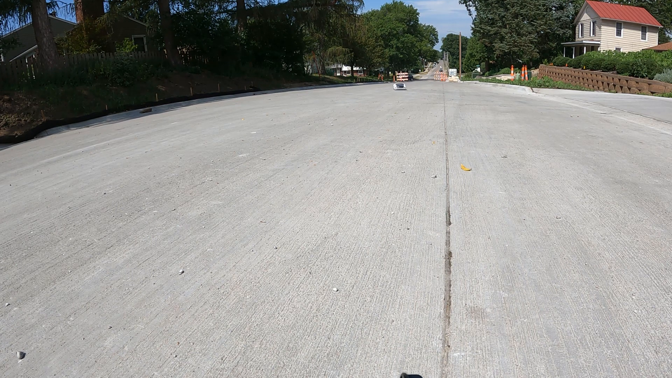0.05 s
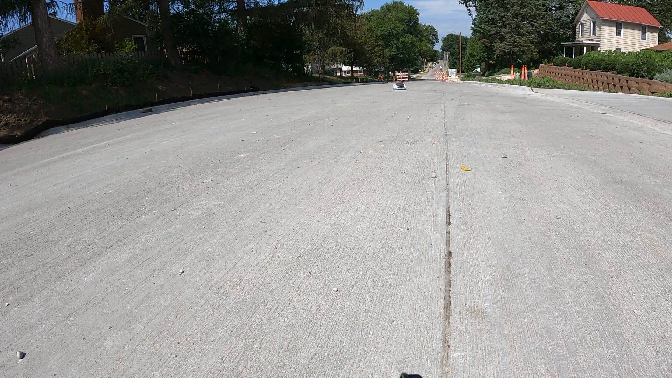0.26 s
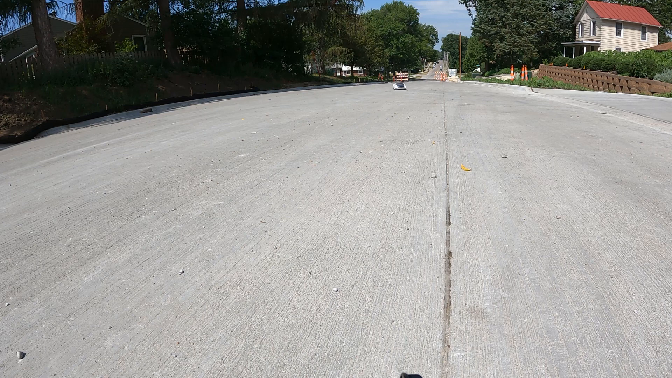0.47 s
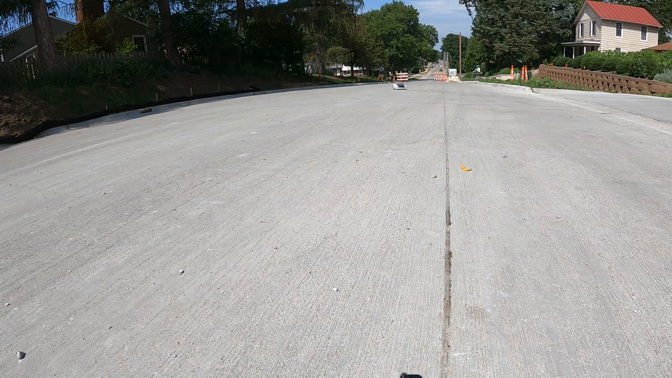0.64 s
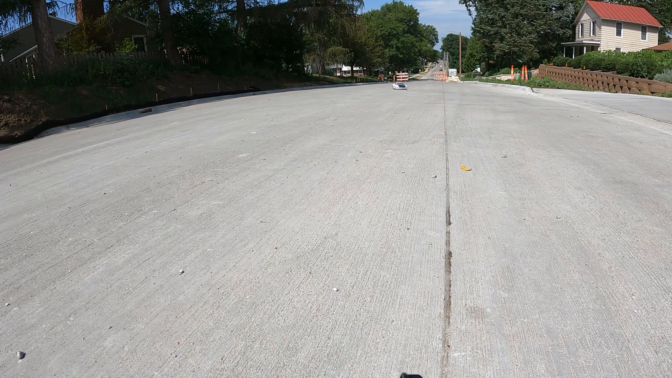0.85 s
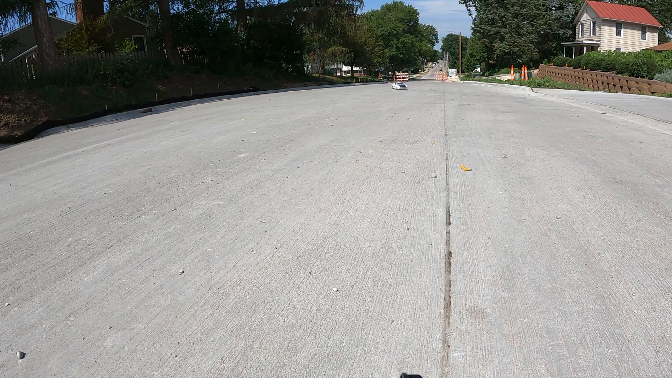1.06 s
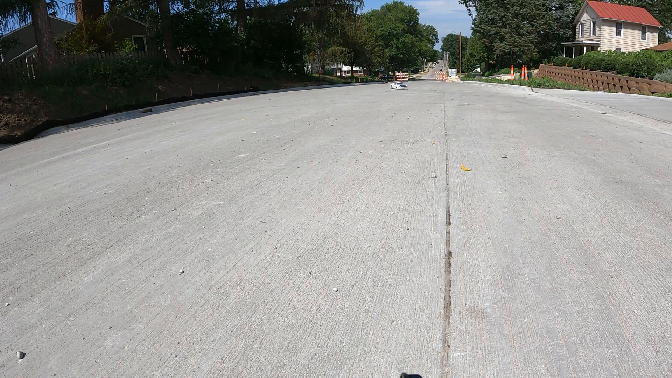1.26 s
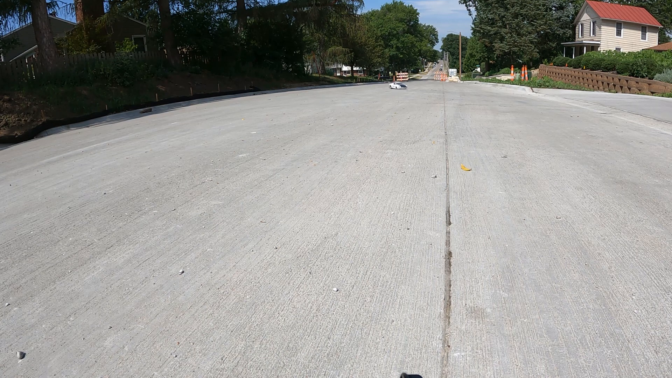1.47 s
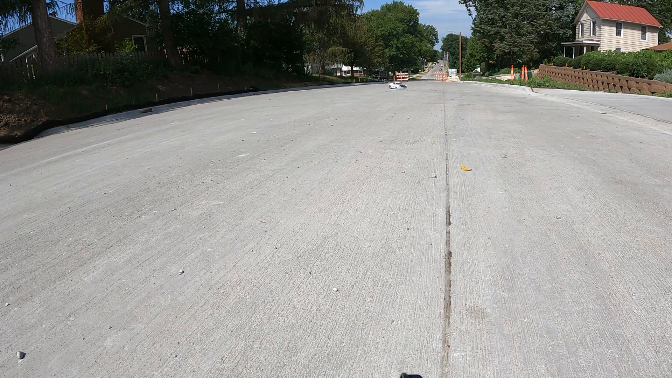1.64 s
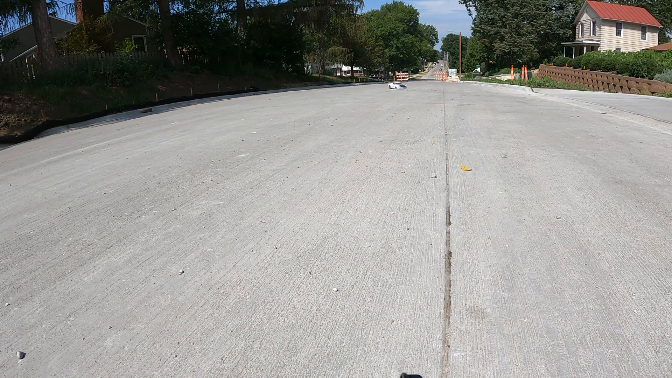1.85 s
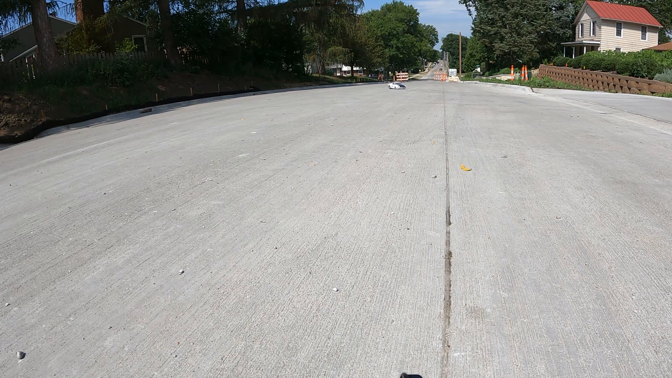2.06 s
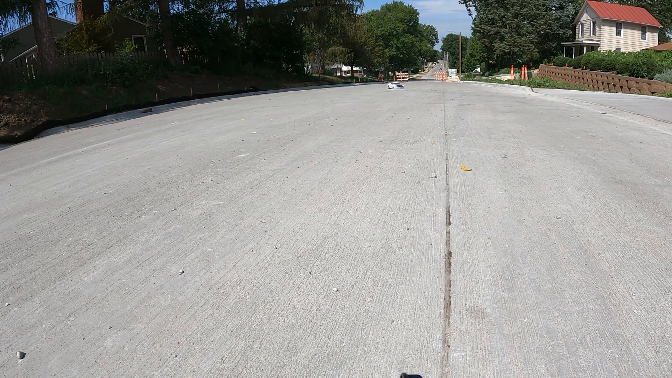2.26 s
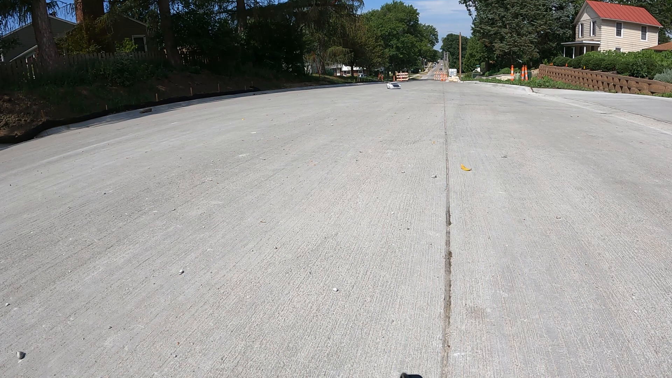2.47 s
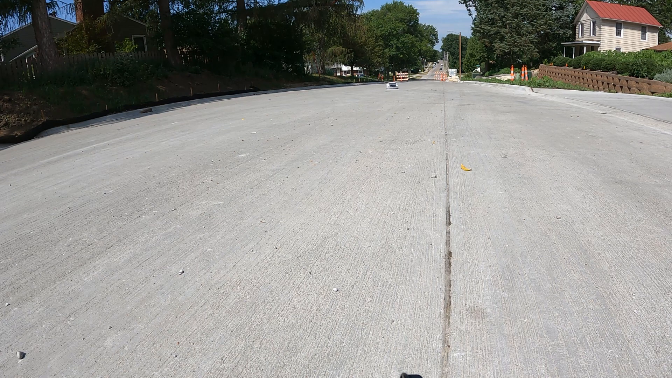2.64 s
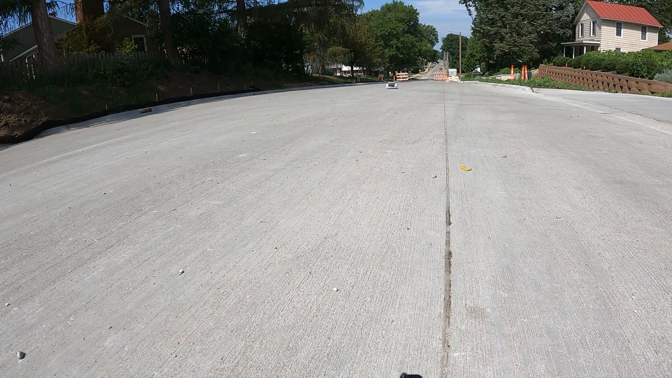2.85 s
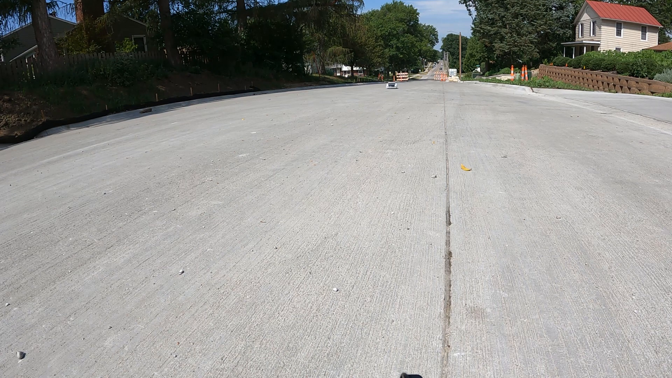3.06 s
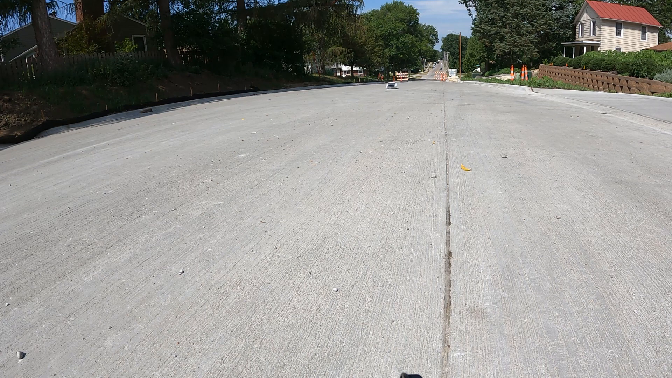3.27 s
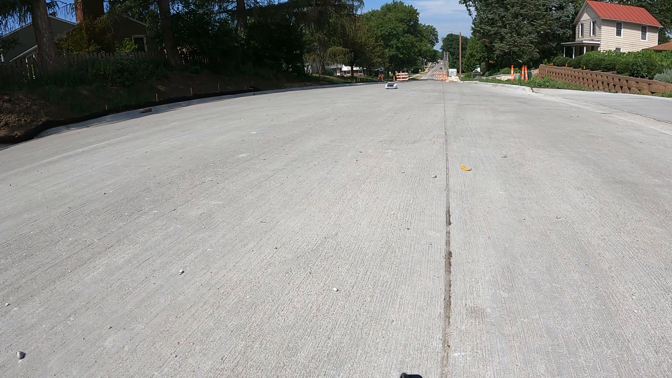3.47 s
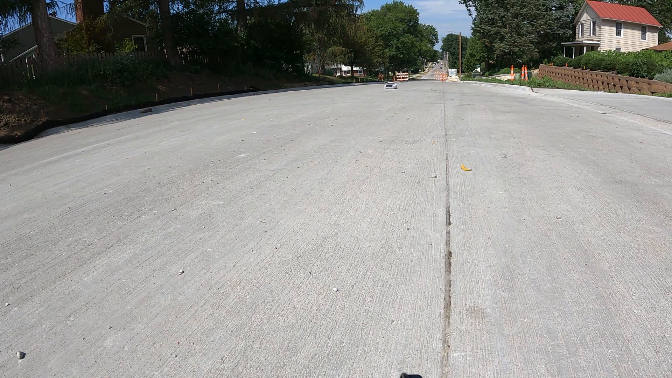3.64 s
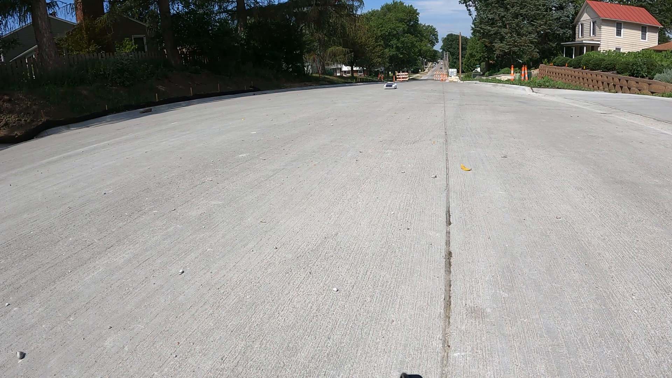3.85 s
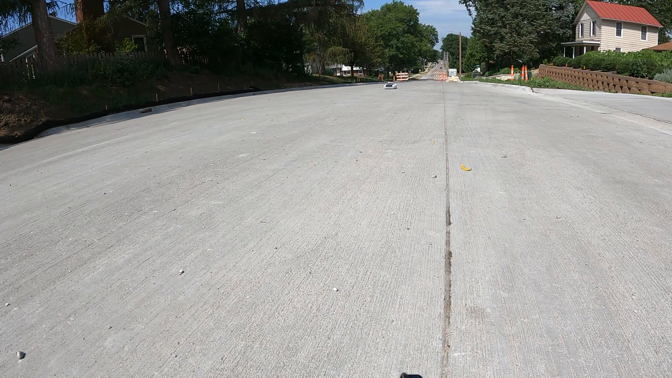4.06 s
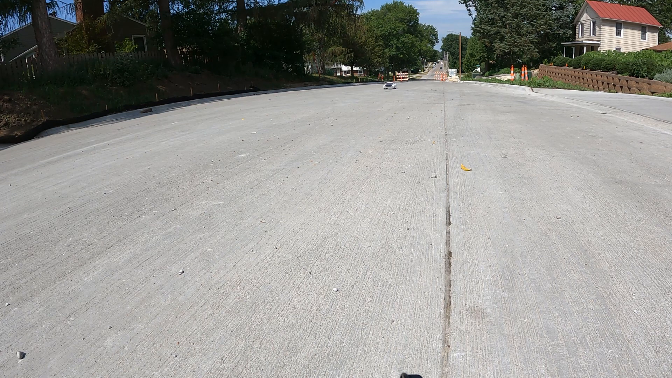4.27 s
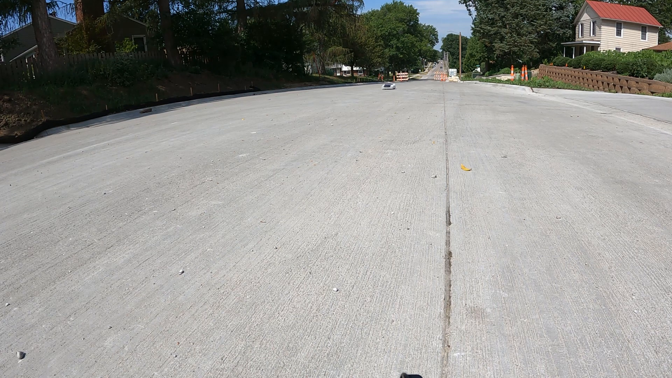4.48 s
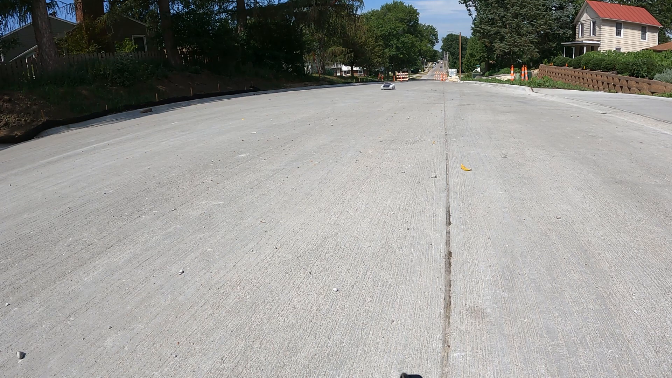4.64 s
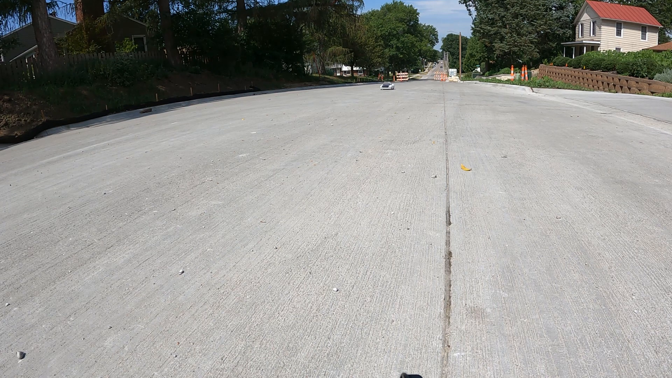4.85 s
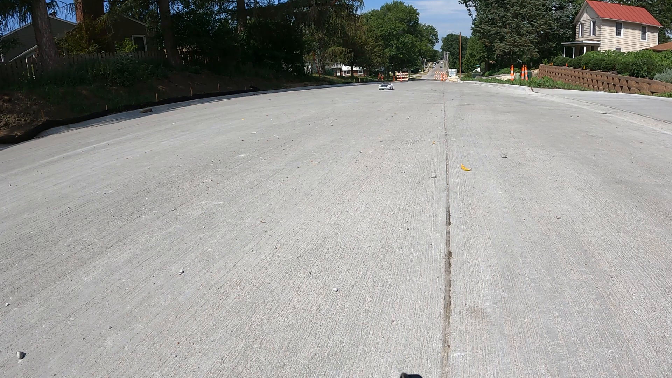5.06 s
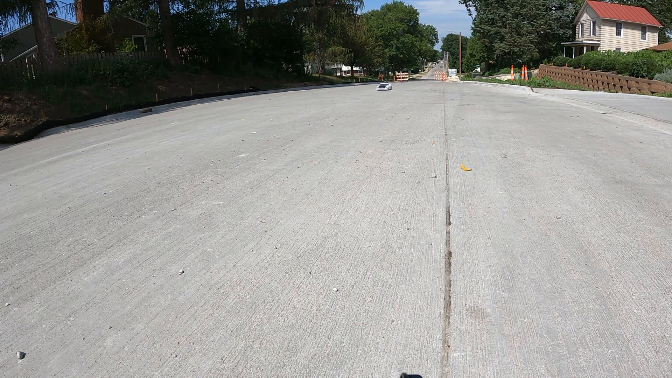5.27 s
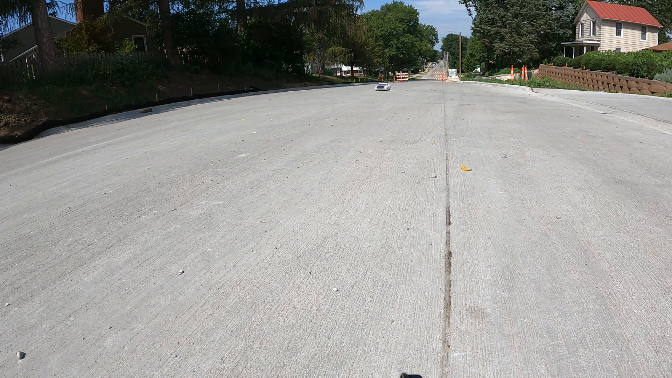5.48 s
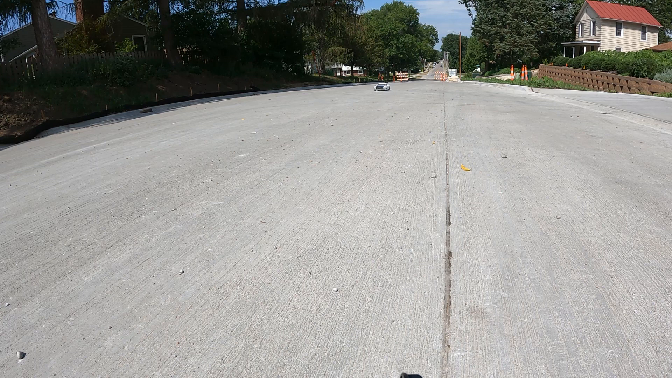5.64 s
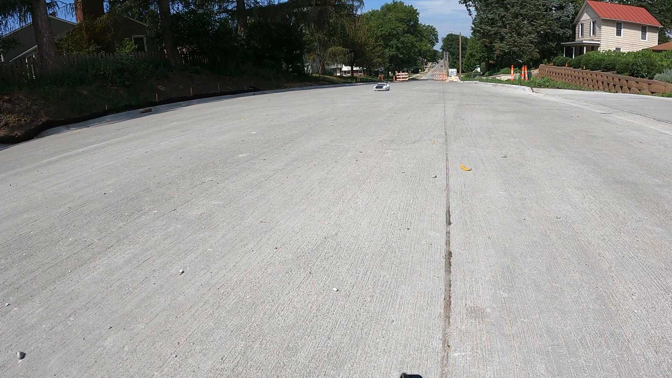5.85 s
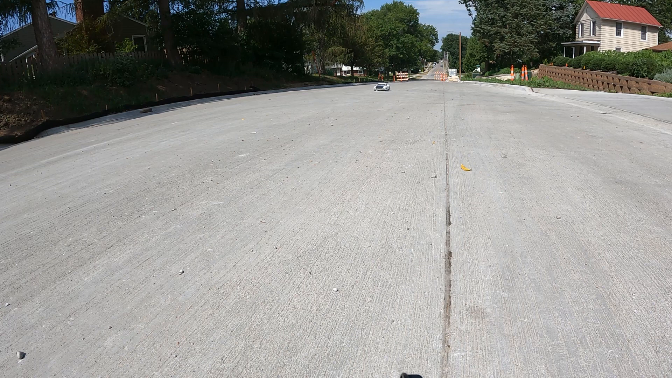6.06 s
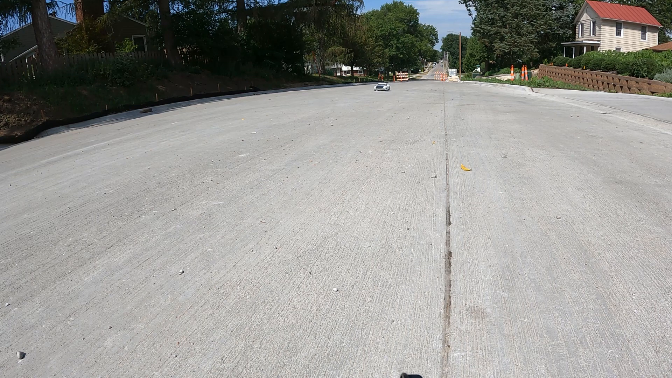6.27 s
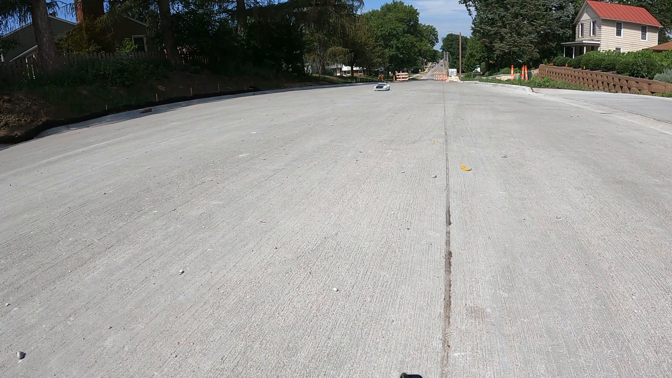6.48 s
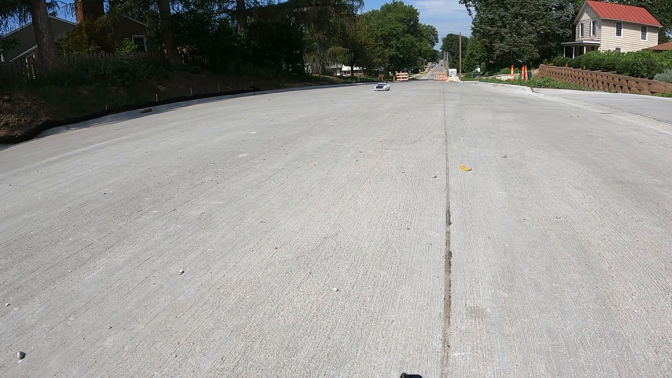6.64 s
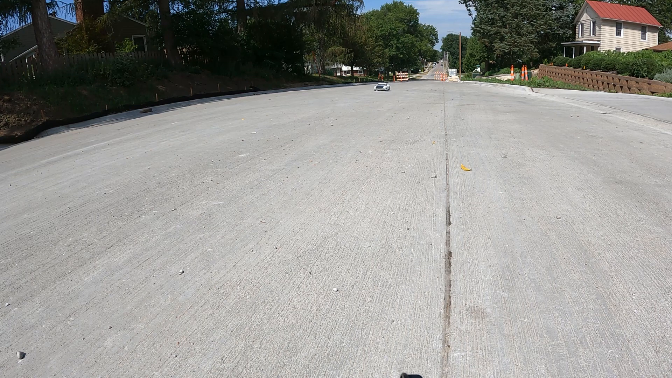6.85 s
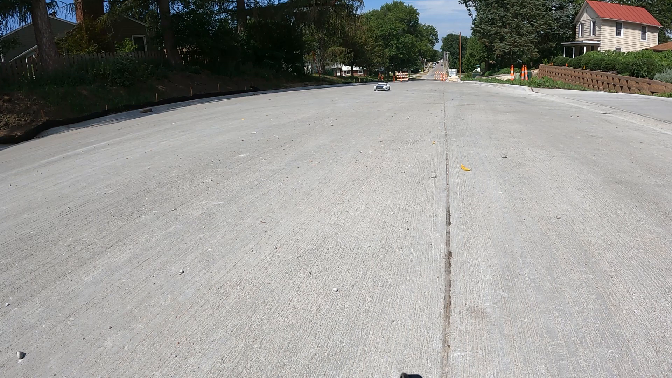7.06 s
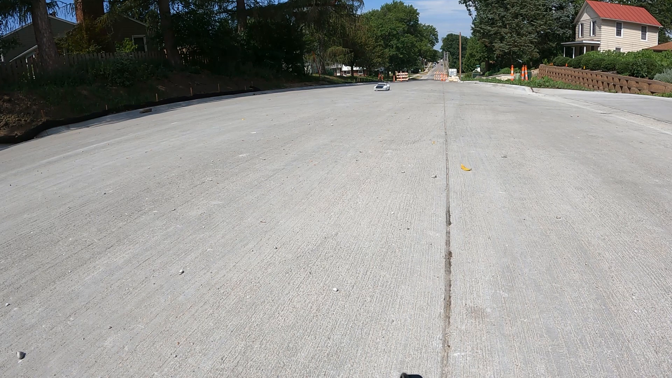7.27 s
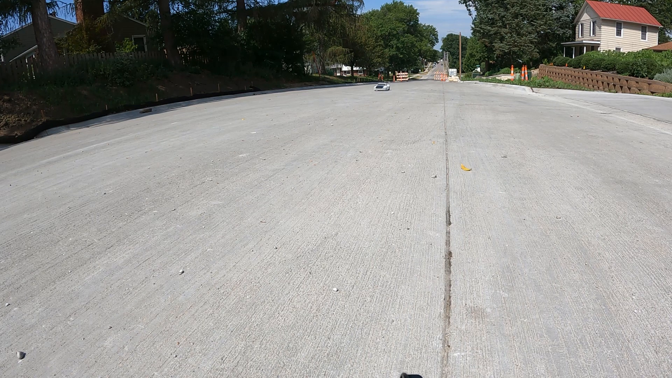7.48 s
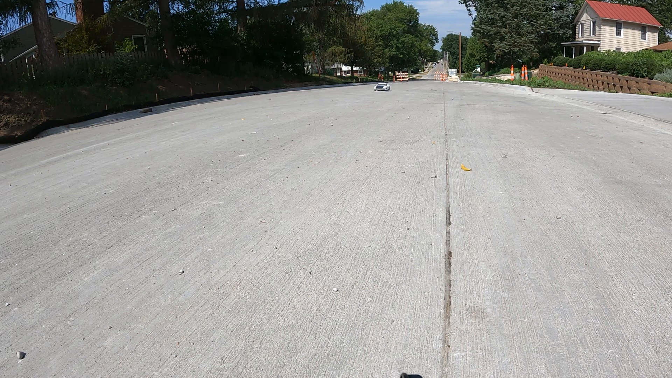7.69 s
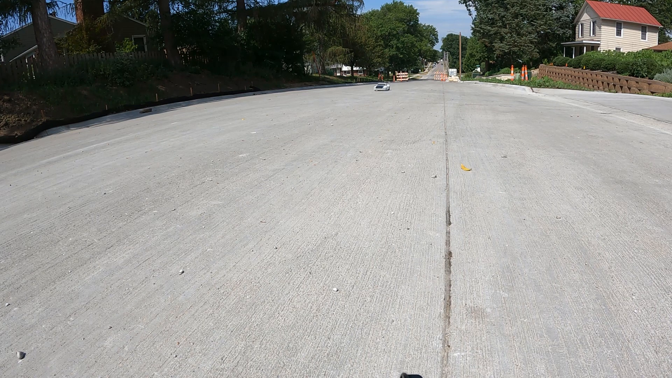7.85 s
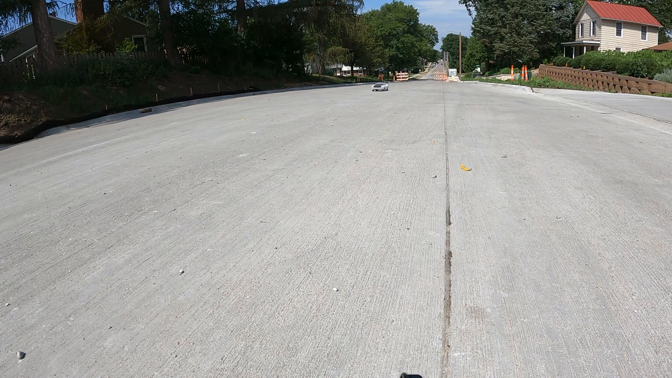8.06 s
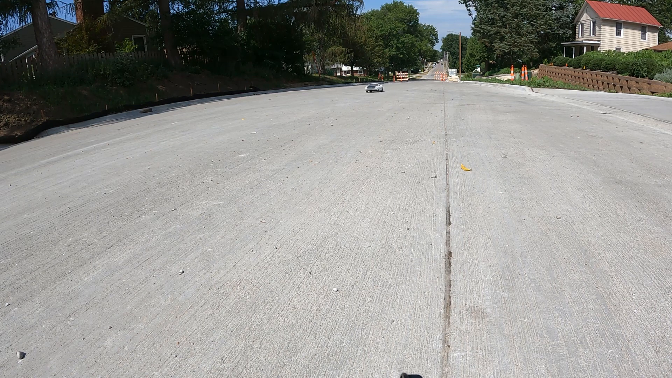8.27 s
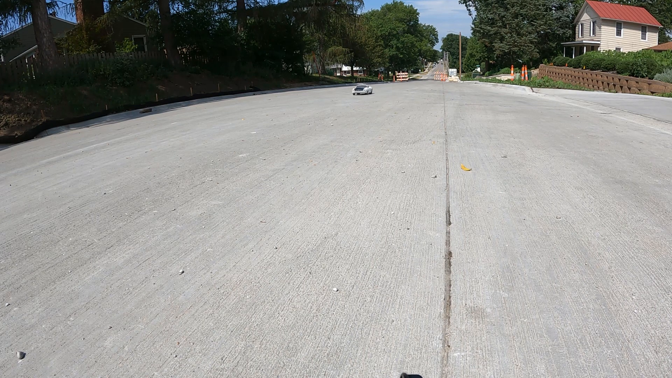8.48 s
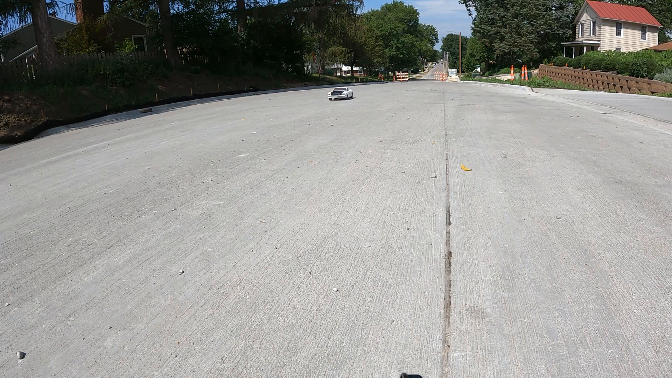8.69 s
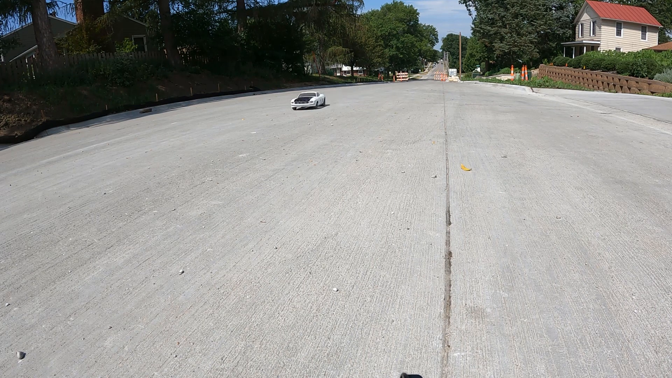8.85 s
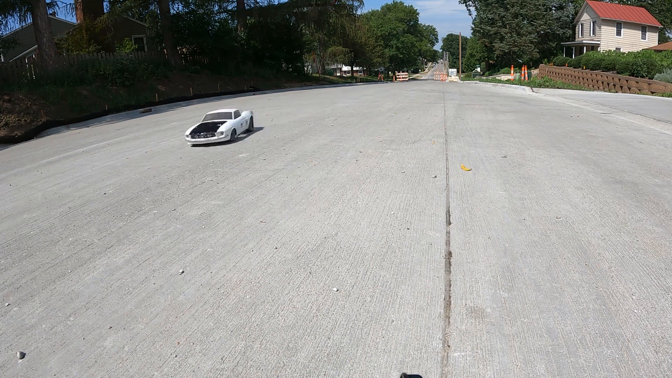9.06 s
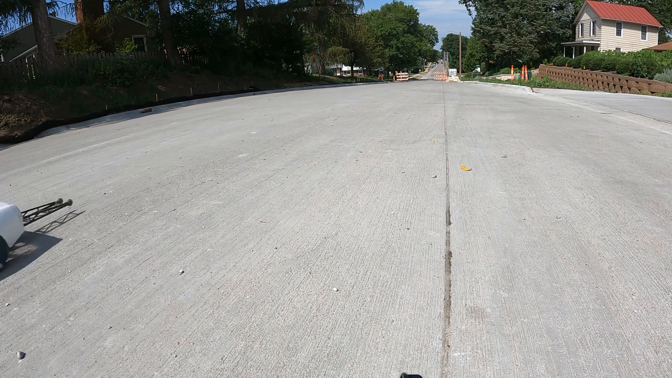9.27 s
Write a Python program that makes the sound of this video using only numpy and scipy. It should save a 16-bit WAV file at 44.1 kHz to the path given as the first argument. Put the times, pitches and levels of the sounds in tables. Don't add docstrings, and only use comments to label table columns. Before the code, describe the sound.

For eight seconds the scene is quiet: distant traffic murmur, scattered bird notes with slight echoes, a low engine drone, brief thin electronic whistles and small tyre scuffs. Then a small electric car launches far down the road with a rapidly climbing scream of motor and gears, holds briefly, grows louder, falls in pitch under braking and skids past to the left with hard plastic knocks and rapid gear grabs. The microphone stays fixed outdoors.

```python
import sys
import numpy as np
from scipy import signal
from scipy.fft import rfft, irfft
from scipy.io import wavfile
from scipy.ndimage import uniform_filter1d

SR = 44100
rng = np.random.default_rng(int(sys.argv[2]) if len(sys.argv) > 2 else 0)


def bounce(signal):
    frames = np.transpose(np.atleast_2d(signal))
    limited = np.clip(frames, -1, 1)
    pcm = np.round(limited * 32767).astype(np.int16)
    wavfile.write(sys.argv[1], SR, pcm)


def how_loud(loudness_db):
    steps = np.asarray(loudness_db, float) / 20
    return 10 ** steps


N = 411012

# (frequency [Hz], level [dB])
SHELL = [(680, -36), (950, -16), (1650, -14), (2050, -19.5), (3450, -1.5), (5600, 1.5), (7400, -11.5),
         (11000, -12)]
FULL_TURNS_HZ = 890
THROTTLE_OFF_S, UNLOAD_DB = 8.948, 17


def rms_one(x):
    return x / np.sqrt(np.mean(np.abs(x) ** 2) + 1e-20)


def times(start=0):
    return np.arange(start, N) / SR


def in_time(rows, start=0):
    s, *columns = np.transpose(rows)
    return [np.interp(times(start), s, c) for c in columns]


def window(t0, t1, start, fade):
    t = times(start)
    return np.clip(np.minimum(t - t0, t1 - t) / fade, 0, 1)


def bump(x, middle, width):
    return np.exp(-((x - middle) / width) ** 2)


def bumps_db(rows, t, width_s):
    return sum(db * bump(t, s, width_s) for s, db in rows)


def at_hz(points, hz):
    point_hz, value = np.transpose(points)
    return np.interp(np.log(hz), np.log(point_hz), value)


def slow(rate, size):
    r = np.exp(-2 * np.pi * rate / SR)
    return rms_one(signal.lfilter([1], [1, -2 * r, r * r], rng.standard_normal(size + 4000))[4000:])


def line(hz, rough, width_hz, phase=None):
    rough = np.clip(rough, 0, 1)
    if phase is None:
        phase = rng.random()
    scatter = slow(width_hz, len(hz)) + 1j * slow(width_hz, len(hz))
    wobble = np.sqrt(1 - rough) + np.sqrt(rough / 2) * scatter
    turning = np.exp(2j * np.pi * (np.cumsum(hz) / SR + phase))
    return np.sqrt(2) * np.real(wobble * turning) * (hz < 14200)


def noise(spectrum, size, patchy_db, likeness=None):
    # (frequency [Hz], likeness [0-1])
    outdoors = [(30, 0.97), (60, 1), (180, 0.99), (530, 0.9), (1560, 0.72), (4640, 0.58), (13800, 0.24)]
    hz = np.maximum(np.arange(size // 2 + 1) * SR / size, 1)
    inside = (hz > spectrum[0][0]) & (hz < spectrum[-1][0])
    alike = np.clip(at_hz(likeness or outdoors, hz), 0, 1)
    mid, side = rfft(rng.standard_normal((2, size))) * how_loud(at_hz(spectrum, hz)) * inside
    both = irfft(np.sqrt(1 + alike) * mid + np.sqrt(1 - alike) * side * [[1], [-1]], size)
    return rms_one(both * how_loud(patchy_db * slow(23, size)))


def car():
    # (time [s], rolling noise level [dB], left minus right [dB])
    passing = [
        (7.97, -28, -5),
        (8.08, -50, -3),
        (8.28, -44, -3),
        (8.45, -41.5, -3),
        (8.75, -38.5, -3),
        (8.93, -33, -2.5),
        (9.03, -40.5, -1),
        (9.15, -42, -1),
        (9.32, -35.5, 3.5),
    ]
    start = round(7.9 * SR)
    hiss_db, pan_db = in_time(passing, start)
    near = motor(start) + brake(start) + knocks(start)
    near = near + tyres(start, hiss_db) * window(7.96, 10, start, .17) ** 2
    middle = signal.butter(4, [350, 4600], "band", fs=SR, output="sos")
    shaded = signal.sosfiltfilt(middle, near)
    lows = signal.sosfiltfilt(signal.butter(4, 4500, fs=SR, output="sos"), near)
    lag = .27 * np.minimum(pan_db, 0)
    out = np.zeros((2, N))
    out[:, start:] = near + (np.tanh(0.048 * pan_db) * shaded + lag * np.gradient(lows, axis=1)) * [[1], [-1]]
    return out


def motor(start):
    turns = rotor_turns(start)
    out = rotor(turns, start) + gears(turns, start) + whine(turns, start) + magnetic_pull(turns, start)
    return out * window(7.985, 9.09, start, 0.0047)


def rotor_turns(start):
    # (time [s], turn rate [Hz])
    spin_up = [
        (8.0, 48),
        (8.055, 148),
        (8.128, 352),
        (8.245, 455),
        (8.275, 520),
        (8.36, 800),
        (8.405, 860),
        (8.5, 874),
        (8.545, 890),
    ]
    # (time [s], turn rate [Hz])
    run_out = [
        (8.7, 890),
        (8.8, 890),
        (8.87, 895),
        (8.903, 908),
        (8.945, 828),
        (8.98, 725),
        (9.09, 340),
    ]
    turns = uniform_filter1d(in_time(spin_up + run_out, start)[0], round(.02 * SR))
    turns = turns + 1.0 * turns / FULL_TURNS_HZ * slow(6, len(turns))
    return turns - 12 * bump(times(start), 8.635, .045)


def unloading(off_s, start):
    return np.clip((times(start) - off_s) / 0.012, 0, 1)


def chassis_shake_db(turns, start):
    return 11 * bump(turns, 761, 61) * (times(start) < THROTTLE_OFF_S)


def unbalance_share(turns):
    return np.clip((np.maximum.accumulate(turns) - 805) / 55, 0, 1)


def rotor(turns, start):
    # (multiple of the turn rate, level to the rotor [dB], noisy share [0-1], noise width [Hz])
    tones = [(.236, -4, 0.02, 15), (.39, -6, 0.3, 6), (1, 2, 0, 28), (1.5, -14, 0.39, 71),
             (2, 1.3, 0.17, 52), (3, 2.5, 0.15, 23), (4.005, 6, 0.03, 40), (5, -1, 0.12, 40),
             (5.93, 1.5, 0.2, 37), (6.003, 3, 0.2, 50), (7.004, 3, 0.14, 40), (8, -2, 0.5, 83),
             (9.85, -13, .5, 130), (14.7, -10.5, .8, 200)]
    # (multiple of the turn rate, level to the rotor [dB])
    wheel = [(.157, -8), (.315, -11)]
    # (multiple of the turn rate, level to the rotor [dB])
    side_lines = [(2.4, -13), (4.282, -5), (4.457, -9), (4.548, -7), (5.807, -11), (6.145, -7),
                  (7.893, -10), (7.948, -9)]
    unbalance = unbalance_share(turns)
    level_db = -42.5 + 12 * np.log2(turns / FULL_TURNS_HZ)
    level_db = level_db + 9 * (times(start) - 8.6)
    level_db = level_db + chassis_shake_db(turns, start)
    level_db = level_db - 0.38 * UNLOAD_DB * unloading(8.925, start)
    out = np.zeros(len(turns))
    for k, db, rough, width_hz in tones:
        needs_unbalance = round(k) % 2 == 1 or k < 1
        out += how_loud(level_db + db) * line(k * turns, rough, width_hz) * unbalance ** needs_unbalance
    for k, db in wheel:
        out += how_loud(level_db + db) * line(k * turns, 0.22, 16) * unbalance
    for k, db in side_lines:
        out += how_loud(level_db + db) * line(k * turns, .2, 20) * unbalance
    return out


def radiated_db(hz):
    return at_hz(SHELL, hz) + 3.5 * (np.cos(2 * np.pi * hz / 1094) - 1)


def gears(turns, start):
    slip_s, regrip_s = 8.246, 8.33
    mesh = 4.14 * turns
    unload_db = UNLOAD_DB * unloading(THROTTLE_OFF_S, start) + 8 * bump(times(start), slip_s, 0.0067)
    shake_db = chassis_shake_db(turns, start)
    mesh_db = -28 + at_hz(SHELL, mesh) + 0.18 * shake_db - unload_db
    mesh_db = mesh_db - 6 * (1 - window(8.09, 10, start, 0.15))
    out = how_loud(mesh_db) * line(mesh, .1, 160, phase=0)
    axle = .079 * turns
    below = how_loud(mesh_db - 4) * line(mesh - axle, .08, 60, phase=0)
    above = how_loud(mesh_db - 8) * line(mesh + axle, .08, 60, phase=.5)
    out += unbalance_share(turns) * (below + above)
    second_db = -36.5 + radiated_db(2 * mesh) + 1.1 * shake_db - .4 * unload_db
    out += how_loud(second_db) * line(2 * mesh, 0.35, 90)
    third_db = -33 + radiated_db(3 * mesh) - unload_db - 7 * window(slip_s, regrip_s, start, .015)
    return out + how_loud(third_db) * line(3 * mesh, 0.55, 140)


def whine(turns, start):
    # (time [s], height [dB])
    swells = [
        (8.002, 9),
        (8.057, 5),
        (8.125, 7),
        (8.212, 6),
        (8.255, 4),
        (8.28, 4),
    ]
    pitch = 18.2 * turns
    swell_db = bumps_db(swells, times(start), 0.014)
    out = np.zeros(len(turns))
    for k, db in ((1, 0), (2, -17)):
        thin_db = 9 * np.maximum(k * pitch - 9800, 0) / 1000.0
        level_db = -40 + db - thin_db + swell_db + 3.2 * slow(22, len(turns)) - 6
        level_db = level_db + 0.37 * at_hz(SHELL, pitch)
        out += how_loud(level_db) * line(k * pitch, 0.56, 160) * window(7.97, 8.6, start, 0.025)
    return out


def magnetic_pull(turns, start):
    # (multiple of the turn rate, level [dB], on [s], off [s])
    pulls = [
        (6, -52, 8.04, 8.085),
        (4.14, -50, 8.065, 8.25),
        (8.28, -48, 8.1, 8.3),
        (2, -45, 8.195, 8.32),
        (2, -43, 8.31, 8.52),
        (6, -49, 8.29, 8.36),
        (8.28, -45, 8.3, 8.375),
        (9.85, -45, 8.3, 8.365),
    ]
    return sum(how_loud(db) * line(k * turns, .1, 40) * window(on, off, start, .02) for k, db, on, off in pulls)


def brake(start):
    # (multiple of its pitch, level [dB])
    orders = [(1, 1), (2, 2.5), (3, -1.5), (4, 3), (4.3, -6.5), (5.001, -22), (5.999, -1), (7, -15),
              (8, -27)]
    # (time [s], length [s], pitch [Hz], level [dB], loss of the lowest and highest multiples [dB])
    grabs = [
        (9.159, 0.018, 1250, -37.5, 6),
        (9.187, 0.019, 1283, -43, 2),
        (9.215, 0.015, 1290, -33.5, 2),
        (9.239, 0.013, 1270, -35, 0),
        (9.259, 0.013, 1260, -32, 1),
        (9.278, 0.02, 1243, -30.5, 1),
        (9.299, .04, 1247, -30, 1),
    ]
    out = np.zeros(N - start)
    for s, length, hz, db, edge_loss_db in grabs:
        at = round(s * SR)
        pitch = np.full(N - at, hz)
        stack = np.zeros(N - at)
        for k, order_db in orders:
            loss_db = edge_loss_db * (k < 2.5 or k > 5.5)
            stack += how_loud(order_db - loss_db + rng.normal(0, 1.5)) * line(k * pitch, .2, 90)
        out[at - start:] += how_loud(db) * stack * window(s, s + length, at, 0.0026)
    return out


def knocks(start):
    # (time [s], peak level [dB], ring pitch [Hz], time to fall 60 dB [s])
    hits = [(8.623, -21, 1365, 0.038), (8.8283, -20.5, 1870, 0.018), (8.928, -17, 2010, 0.027),
            (8.971, -19, 2160, 0.027), (8.986, -21, 1450, .03), (9.007, -25, 700, 0.027),
            (9.036, -24, 750, .03), (9.046, -23, 2100, .025), (9.066, -23, 3250, .04),
            (9.021, -23, 708, 0.036), (9.029, -26, 403, 0.041), (9.059, -25.5, 300, 0.046),
            (9.07, -27.5, 550, .03), (9.0958, -18.5, 1660, 0.021), (9.104, -23, 1420, .025),
            (9.157, -27.5, 6450, .07), (9.1628, -16, 1660, 0.028), (9.1665, -12, 1714, 0.032),
            (9.18, -22, 5480, .03), (9.19, -20.5, 3850, .025), (9.192, -23, 350, 0.042),
            (9.2, -15.5, 1520, 0.029), (9.2052, -13, 1760, 0.03), (9.21, -23.5, 5500, 0.036),
            (9.2202, -15.5, 3700, 0.02), (9.2377, -9.5, 1766, 0.037), (9.259, -17, 5200, .035)]
    out = np.zeros(N - start + SR)
    t = np.arange(SR // 8) / SR
    dull = signal.butter(2, 4000, fs=SR, output="sos")
    for s, db, hz, t60 in hits:
        crack = signal.sosfilt(dull, rng.standard_normal(len(t)))
        ring = np.sin(2 * np.pi * hz * t) + 0.29 * np.sin(2 * np.pi * hz * 1.13 * t) + 0.36 * crack
        at = round(s * SR) - start
        out[at:at + len(t)] += how_loud(db - 1.0 - 60 * t / t60) * np.minimum(t / 0.00091, 1) * ring
    return out[:N - start]


def tyres(start, hiss_db):
    # (frequency [Hz], level per Hz [dB])
    roar_colour = [(71, -37), (120, -6.5), (353, 1.5), (711, -3), (1240, -8.5), (1640, -3.5), (2500, -10.5),
                   (3250, -34), (5500, -120)]
    # (frequency [Hz], level per Hz [dB])
    hiss_colour = [(530, -81), (900, -6), (1190, -16), (1750, -9), (2380, -12), (2720, -8), (2850, -8.5),
                   (3650, -3), (4960, -6.5), (6210, -4.5), (8340, -20), (10900, -22), (13300, -27.5),
                   (14300, -47)]
    # (time [s], change of level [dB])
    skips = [
        (8.971, 1.5),
        (9.0, 0),
        (9.028, 2),
        (9.05, -2),
        (9.068, 2),
        (9.086, -3),
    ]
    # (frequency [Hz], likeness [0-1])
    point = [(100, 0.98), (3800, 0.98), (4700, .9995), (6700, .9995), (7100, .7), (8700, .7),
             (9500, .999), (11800, .999), (12800, .4)]
    t, size = times(start), N - start
    hiss_db = hiss_db + bumps_db(skips, t, 0.011)
    since_lock = t - 9.025
    jolt = np.clip(1 + since_lock / 0.055, 0, 1) * np.exp(-np.maximum(since_lock, 0) / 0.19)
    roar_db = hiss_db - 4.5 + 10 * jolt - 5 * window(8.03, 8.31, start, 0.043)
    hiss = noise(hiss_colour, size, 1.2, point)
    for edge_hz, arrive_s, rise_s in ((3020, 7.99, 0.02), (6700, 8.0, 0.08)):
        top = signal.sosfiltfilt(signal.butter(2, edge_hz, "high", fs=SR, output="sos"), hiss)
        hiss = hiss - top * (1 - window(arrive_s, 10, start, rise_s))
    return how_loud(roar_db + 3.5) * noise(roar_colour, size, 1.5, point) + how_loud(hiss_db + 9.5) * hiss


def controller():
    # (on [s], off [s], tone level [dB], octave level [dB])
    touches = [(0.86, 1.325, -77, -94), (2.034, 2.42, -62, -93), (2.418, 2.71, -68.5, -95),
               (3.225, 3.36, -73, -94), (3.352, 3.615, -62, -92), (3.74, 3.895, -87, -89),
               (4.176, 4.306, -62.5, -86), (4.303, 4.453, -58.5, -89), (4.7, 4.86, -72, -94),
               (4.99, 5.143, -60.5, -91), (5.264, 5.418, -75, -94), (7.886, 7.93, -69, -94),
               (7.926, 8.02, -53.5, -90)]
    tone = line(np.full(N, 5914), 0.56, 97)
    octave = line(np.full(N, 11800), .99, 220)
    out = np.zeros(N)
    for on, off, tone_db, octave_db in touches:
        out += window(on, off, 0, 0.014) * how_loud(tone_db) * tone
        out += window(on - .02, off + .02, 0, 0.046) * how_loud(octave_db) * octave
    return out


def engine():
    # (time [s], firing rate [Hz], effort [dB])
    pulling_away = [(0.0, 51.2, -51), (.7, 59.8, -54), (1.2, 65.7, -38), (1.5, 72.1, -37.5),
                    (1.8, 77.6, -34), (2.4, 81.5, -33), (2.7, 86.8, -33.5), (3.2, 91.8, -33.5),
                    (3.6, 96.2, -35.5), (4.3, 95.8, -33.5), (4.6, 96.3, -39), (5.2, 97, -39),
                    (6.0, 96.45, -38), (7.0, 97.3, -37.5), (7.5, 97.1, -41.5), (8.3, 96.9, -43),
                    (9.32, 97.3, -46)]
    # (frequency [Hz], level [dB])
    exhaust = [(60, -5.5), (90, 0), (152, -4.5), (168, -18.5), (222, -25), (250, -7), (280, -28),
               (380, -26.5)]
    # (multiple of the firing rate, level [dB])
    orders = [(1.5, -18.5), (2, -0.5), (3, 0.3), (4, -0.7)]
    # (time [s], depth [dB])
    fades = [(.72, 15), (1.69, 15), (2.6, 6), (3.48, 15), (5.32, 5.5), (5.83, 14), (6.5, 18), (7.85, 28),
             (8.6, 5), (9.2, 7)]
    firing, effort_db = in_time(pulling_away)
    fade_db = bumps_db(fades, times(), 0.13)
    out = how_loud(effort_db + at_hz(exhaust, firing) - fade_db) * line(firing, 0.0076, 5.1)
    for k, db in orders:
        out += how_loud(effort_db + db + at_hz(exhaust, k * firing)) * line(k * firing, 0.12, 5.4)
    return out


def bird_notes():
    # (time [s], middle pitch [Hz], peak level [dB])
    whits = [(.32, 4080, -63), (.345, 3130, -60), (1.51, 4000, -63), (1.57, 3700, -65),
             (2.053, 3640, -56.5), (6.43, 4000, -64), (6.41, 3900, -67), (3.855, 3930, -58.5),
             (3.915, 3300, -63), (4.682, 3830, -53.5), (4.75, 3890, -63), (6.392, 3700, -66),
             (6.45, 3600, -63), (6.492, 3700, -58), (6.562, 3820, -61), (7.63, 3800, -59)]
    # (time [s], length [s], start pitch [Hz], end pitch
    # [Hz], peak level [dB])
    slurs = [(2.953, .014, 2950, 2350, -53.5), (2.966, 0.013, 3000, 2600, -48.5),
             (2.978, .014, 2600, 2250, -56), (1.26, .028, 3650, 4050, -56), (5.052, .055, 2750, 4250, -47),
             (6.362, .018, 4500, 5350, -66), (6.71, .045, 4350, 3750, -64.5), (5.64, .025, 3500, 3750, -63),
             (8.9, .02, 7200, 8600, -73), (1.148, .025, 2850, 2680, -47.5), (2.28, 0.11, 4560, 3720, -56),
             (3.184, .034, 7300, 6230, -60.5), (3.735, .02, 3000, 2300, -60),
             (3.113, 0.019, 3480, 5060, -46.5)]
    # (time [s], length [s], start pitch [Hz], end pitch [Hz], peak level
    # [dB])
    dives = [(1.082, .016, 4150, 3570, -50), (1.095, .054, 3300, 2540, -44.5),
             (2.184, 0.048, 4650, 3300, -61), (2.26, 0.02, 4200, 2800, -62),
             (2.895, .03, 4550, 3700, -66.5), (4.638, .024, 4700, 3320, -61),
             (4.701, .018, 4380, 3330, -54), (3.55, 0.063, 3200, 4600, -59.5),
             (3.765, .035, 3160, 5300, -65)]
    # (time [s], length [s], edge pitch [Hz],
    # middle to edge [ratio], peak level [dB])
    arches = [(0.595, 0.064, 3500, 1.04, -56.5), (0.924, .026, 4850, .97, -58),
              (.944, 0.008, 2950, 1.03, -55.5), (2.242, 0.029, 3740, 1.16, -56),
              (3.263, 0.038, 4670, 1.1, -55), (3.41, .025, 4650, 0.86, -54.5),
              (4.097, 0.047, 4220, 1.3, -59), (5.057, 0.0744, 1620, 1.25, -51),
              (5.622, .016, 4250, 0.95, -61), (5.305, 0.051, 4500, 1.05, -57.5),
              (5.395, 0.019, 3840, 0.97, -57)]
    # (time [s], length
    # [s], pitch [Hz], peak level [dB])
    held = [(.008, 0.017, 3360, -59), (0.056, .02, 2550, -59), (0.499, .07, 2450, -67),
            (0.604, .045, 4000, -58), (0.712, 0.024, 4450, -59), (2.561, 0.23, 2460, -66.5),
            (3.318, .06, 2470, -65), (3.35, .015, 4020, -56), (3.6, 0.033, 2480, -59),
            (3.798, .02, 5300, -64), (3.829, .006, 1150, -46.5), (3.829, 0.0048, 1890, -48),
            (4.27, .016, 1300, -54), (4.275, .02, 930, -53), (4.325, .022, 1050, -55),
            (4.326, .012, 1520, -55), (5.068, .008, 1000, -50), (5.108, .01, 1030, -51),
            (5.531, 0.13, 932, -58), (6.55, .018, 3330, -61), (6.492, .02, 3400, -60),
            (1.17, .012, 2980, -55), (4.27, .015, 2560, -53), (4.305, .015, 1656, -51.5),
            (4.67, .025, 5200, -58), (4.709, 0.047, 4900, -58), (5.03, .015, 960, -49.5),
            (7.245, .02, 4000, -64), (7.902, .06, 3450, -67), (.85, 0.52, 3480, -70.5),
            (.8, 0.13, 2470, -67), (.93, .07, 2475, -61), (1.0, .12, 2475, -69), (.97, 0.018, 7250, -66),
            (1.517, 0.094, 7480, -68), (1.55, .26, 11540, -85), (1.71, 0.019, 2600, -61),
            (1.71, .025, 5240, -64), (2.053, .27, 11450, -82.5), (2.062, .25, 12700, -89),
            (3.125, 0.052, 5620, -62), (3.335, 0.052, 3530, -54), (3.603, 0.096, 3437, -59),
            (3.752, .035, 2505, -56), (3.8, .07, 2290, -61), (3.829, 0.006, 1490, -45),
            (4.183, 0.073, 3940, -61.5), (4.308, .012, 2760, -49), (5.518, .006, 1100, -50),
            (6.378, 0.05, 5350, -71), (6.435, .03, 5350, -70), (6.777, 0.014, 4280, -59),
            (7.554, 0.031, 4970, -55.5)]
    # (time [s], pitch [Hz], peak level [dB])
    trills = [
        (.947, 4850, -55),
        (.922, 2900, -58),
    ]
    notes = [(s, 0.035, [hz * .85, hz, hz * 1.21], db) for s, hz, db in whits]
    for rows, done_by_middle in ((slurs, .8), (dives, 0.27)):
        for s, length, first, last, db in rows:
            notes.append((s, length, [first, first + done_by_middle * (last - first), last], db))
    notes += [(s, length, [hz, hz * bend, hz], db) for s, length, hz, bend, db in arches]
    notes += [(s, length, [hz, hz, hz], db) for s, length, hz, db in held]
    for s, hz, db in trills:
        notes += [(s + k * .0112, .008, [.98 * hz, hz, 1.02 * hz], db) for k in range(4)]
    return notes


def add_whistle(out, s, length, hz, db):
    u = np.linspace(0, 1, round(length * SR))
    pitch = np.polyval(np.polyfit([0, .5, 1], hz, 2), u)
    at = round(s * SR)
    out[at:at + len(u)] += how_loud(db) * np.sin(np.pi * u) ** 0.3 * line(pitch, 0.34, 110)


def birds():
    # (time [s], length [s], centre pitch [Hz], level [dB])
    twitter = [(0.0, .1, 4020, -65.5), (0.511, 0.1, 4700, -63.5), (0.599, 0.16, 3900, -64.5),
               (0.919, 0.094, 4580, -70), (1.173, 0.19, 4190, -64), (1.444, 0.27, 4010, -65.5),
               (3.265, 0.2, 4340, -60), (4.119, 0.27, 4560, -64.5), (4.68, 0.17, 4460, -61.5),
               (5.312, 0.3, 4380, -63.5), (6.249, .12, 3810, -73.5), (6.392, .15, 3910, -66.5),
               (6.687, 0.25, 4050, -68.5), (7.238, 0.1, 4100, -71.5), (7.371, .12, 4110, -70),
               (7.5, 0.13, 5600, -72), (7.553, 0.25, 4250, -60)]
    near, far = np.zeros((2, N))
    for note in bird_notes():
        add_whistle(near, *note)
    for s, length, hz, db in twitter:
        for when, low, rise, long in rng.random((20, 4)):
            glide = hz * (.78 + .24 * low + (.08 + .2 * rise) * np.array([0, .4, 1]))
            add_whistle(far, s + length * when ** 1.3, 0.011 + .018 * long, glide, db - 5 * when)
    t = np.arange(SR // 4) / SR
    tails = how_loud(-60 * t / .36) * rng.standard_normal((2, len(t))) * (t > .008)
    tails = tails + 0.23 * tails[::-1]
    echoed = how_loud(-36.0) * near + how_loud(-27.0) * far
    return near + 0.78 * far + signal.fftconvolve(echoed[None], tails, axes=1)[:, :N]


def street():
    # (time [s], level [dB])
    traffic = [
        (0, -53.5),
        (1.2, -52.5),
        (2.2, -54.5),
        (5.3, -55.5),
        (5.9, -57),
        (7.2, -59),
        (9.32, -59.5),
    ]
    # (frequency [Hz], level per Hz [dB])
    rumble = [(12, -40), (20, -9), (92, -3), (115, -5), (151, -9.5), (200, -7.5), (312, -19.5),
              (500, -25.5), (650, -49.5), (1100, -120)]
    # (frequency [Hz], level per Hz [dB])
    murmur = [(180, -27), (300, -5), (467, -9.5), (555, -9), (600, -12), (761, -13), (1010, -8),
              (1110, -10.5), (1480, -11), (2050, -18.5), (3400, -22.5), (7850, -37.5), (13000, -78.5)]
    # (frequency [Hz], level per Hz [dB])
    scuff = [(710, -38), (1200, -12.5), (1970, -2), (2320, -26), (2730, -9.5), (5960, -4.5), (8550, -30),
             (14000, -37.5)]
    # (time of peak [s], length [s], level [dB])
    scuffs = [(0.537, 0.11, -63.5), (1.24, 0.19, -60.5), (1.516, 0.26, -64.5), (3.814, 0.39, -63),
              (4.304, 0.092, -49.5), (4.426, 0.14, -60.5), (4.723, 0.3, -62), (4.998, 0.048, -60),
              (5.085, 0.12, -46.5), (5.357, 0.47, -66), (7.567, 0.13, -66), (7.972, .2, -61)]
    middle_db, = in_time(traffic)
    rumble_db = -45 + 0.38 * (middle_db - middle_db.mean())
    out = how_loud(rumble_db) * noise(rumble, N, 0.86) + how_loud(middle_db + 2.5) * noise(murmur, N, 0.94)
    swell = sum(how_loud(db) * bump(times(), s, length / 2.1) for s, length, db in scuffs)
    gritty = signal.butter(2, [900, 3000], "band", fs=SR, output="sos")
    grit = signal.sosfilt(gritty, rng.standard_normal(N))
    out += swell * how_loud(3.5 + 3.0 * slow(70, N)) * grit
    return out + swell * how_loud(1.5 * slow(150, N)) * noise(scuff, N, 1.2)


def scene():
    return car() + controller() + engine() + birds() + street()


def low_pass(x):
    return signal.sosfilt(signal.butter(12, 14360, fs=SR, output="sos"), x)


def record(dry):
    heard = signal.sosfilt(signal.butter(2, 32.6, "high", fs=SR, output="sos"), dry)
    heard = signal.sosfilt(signal.cheby2(8, 30, 13900, fs=SR, output="sos"), heard)
    return low_pass(heard)


dry = scene()
out = record(dry)
bounce(out)
```